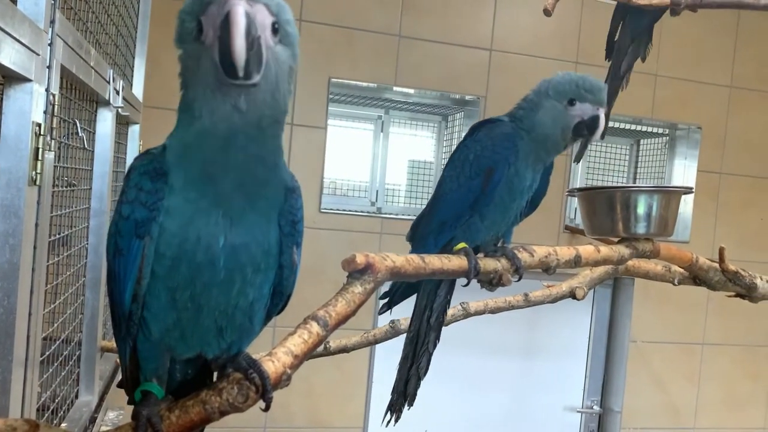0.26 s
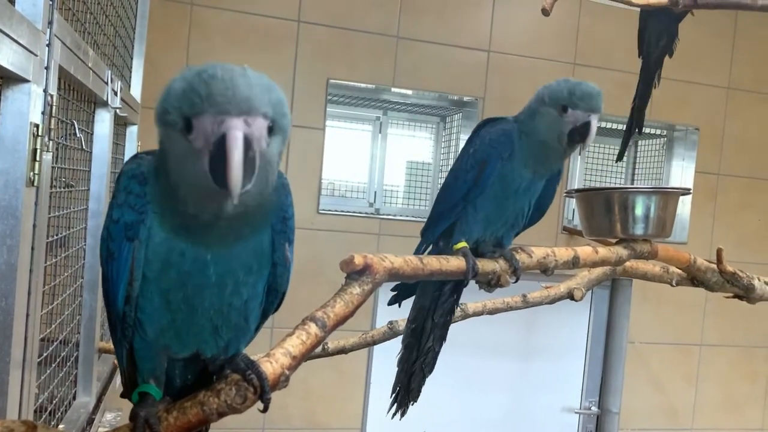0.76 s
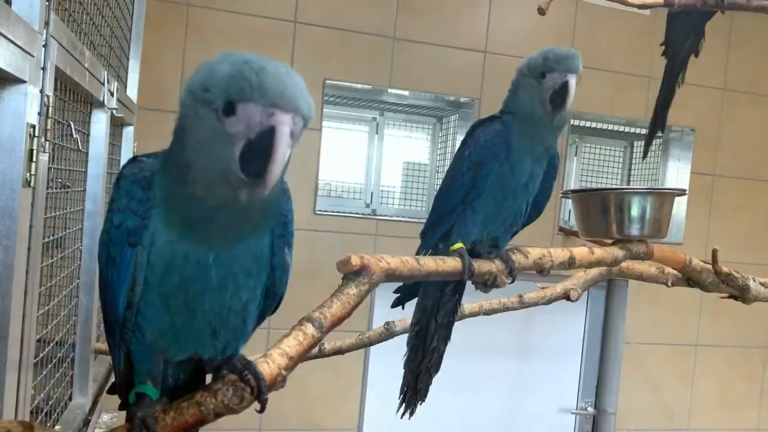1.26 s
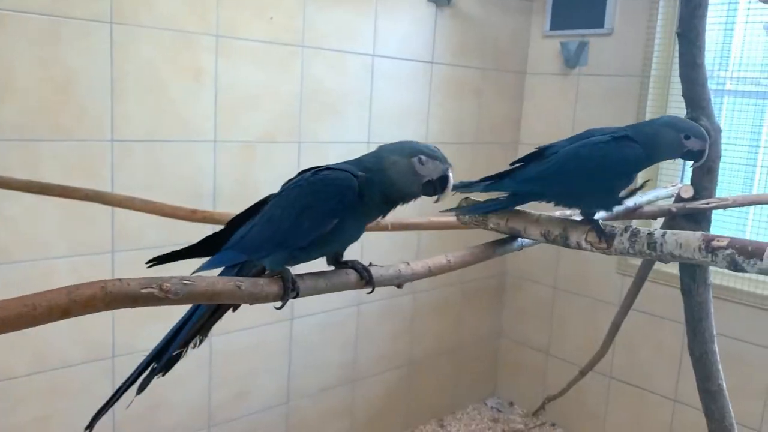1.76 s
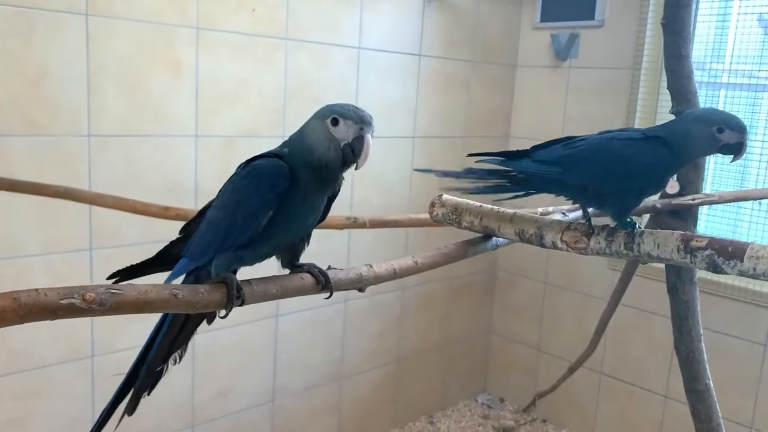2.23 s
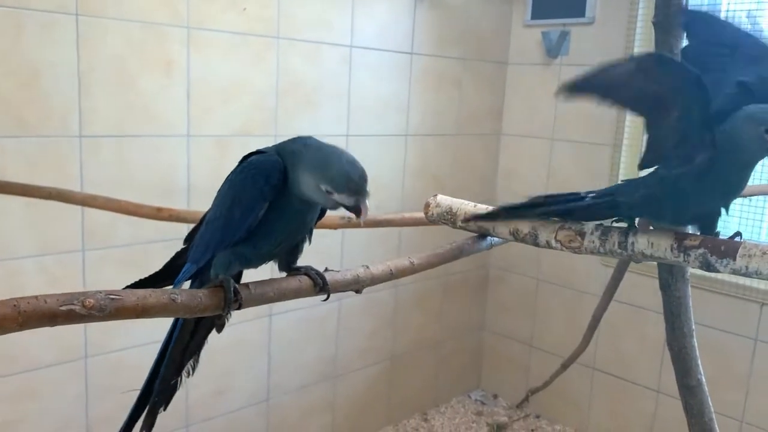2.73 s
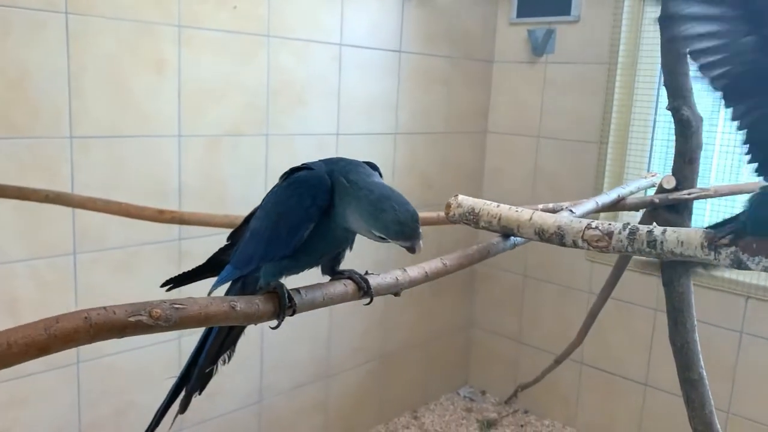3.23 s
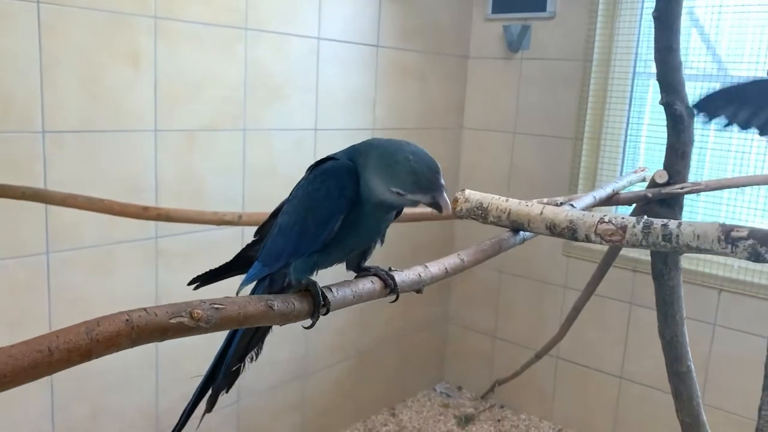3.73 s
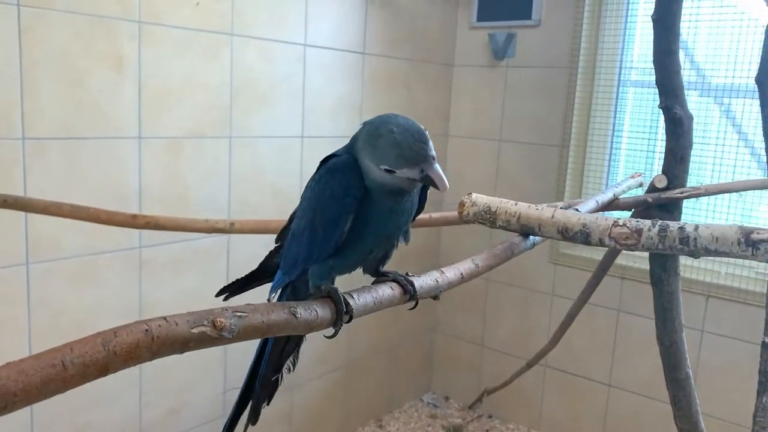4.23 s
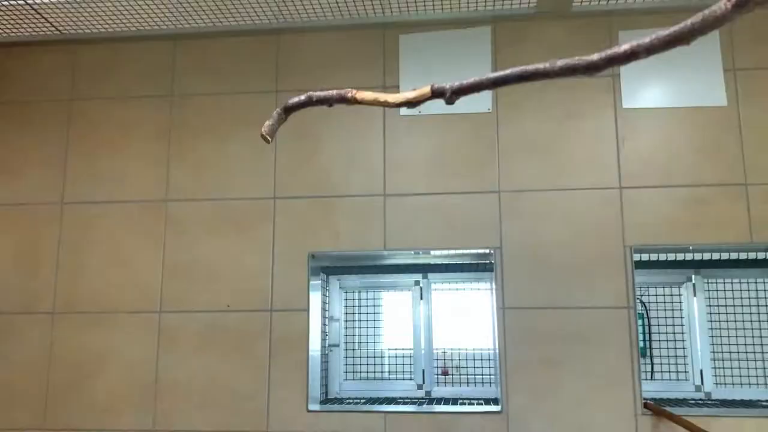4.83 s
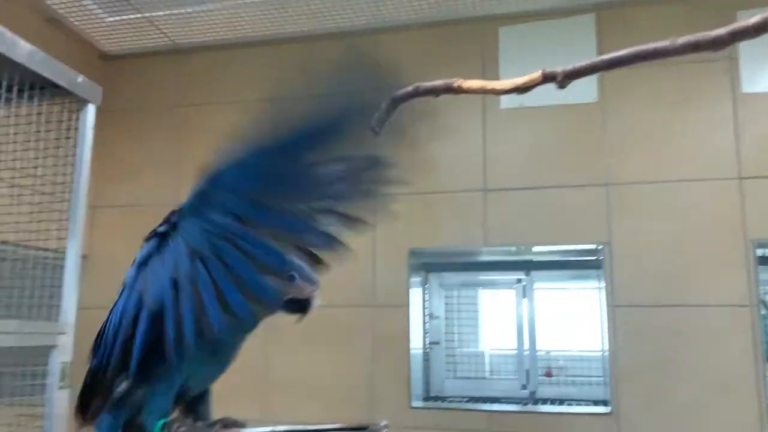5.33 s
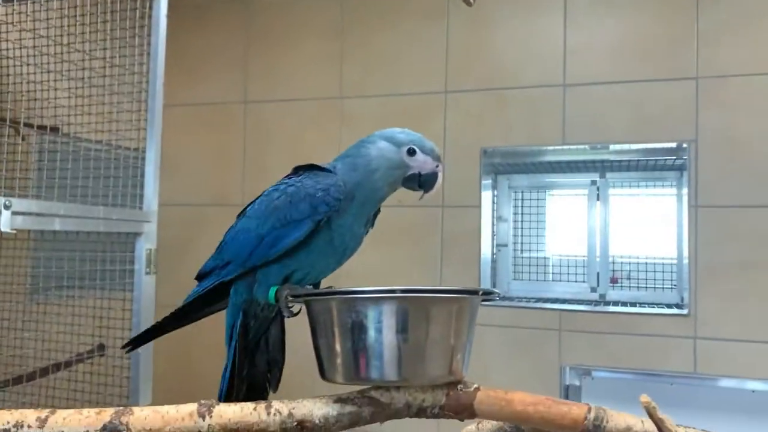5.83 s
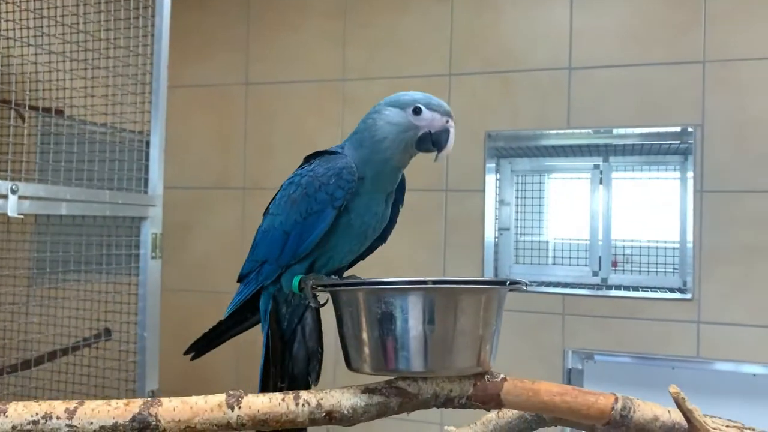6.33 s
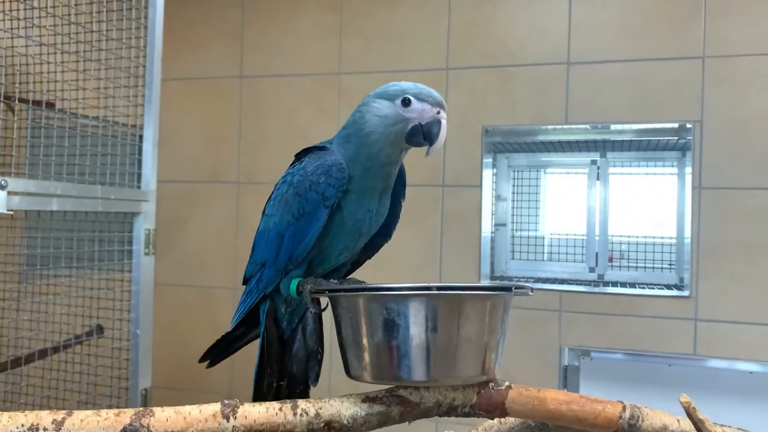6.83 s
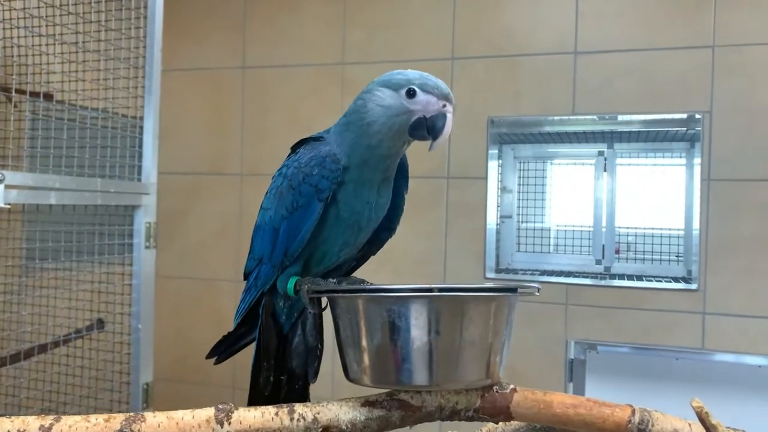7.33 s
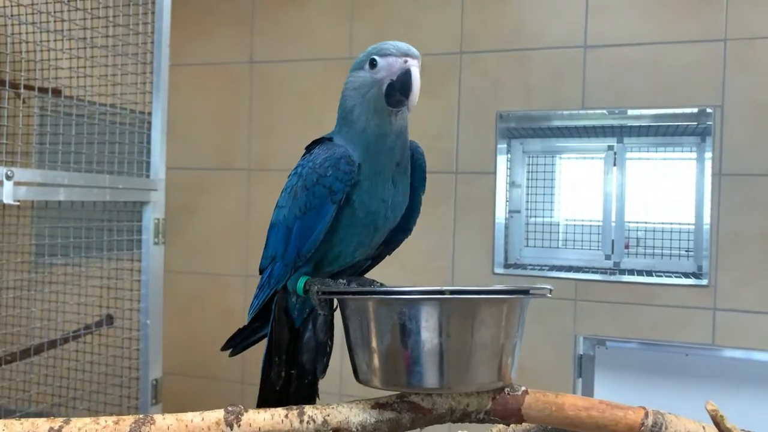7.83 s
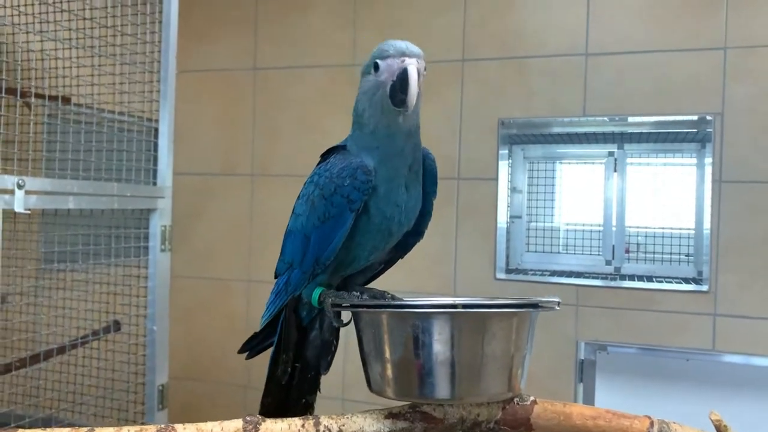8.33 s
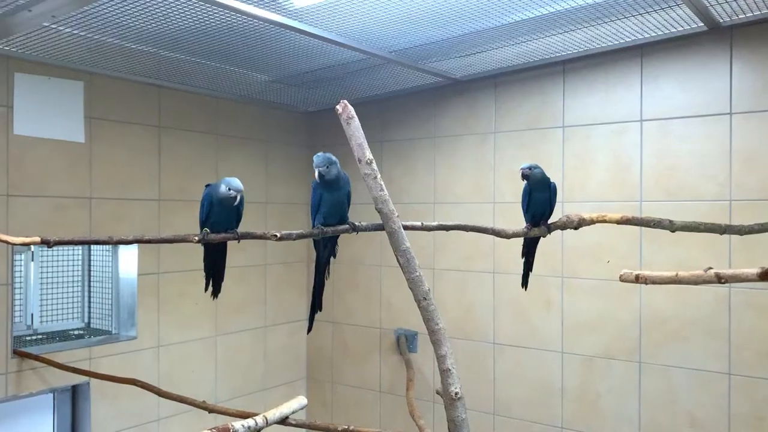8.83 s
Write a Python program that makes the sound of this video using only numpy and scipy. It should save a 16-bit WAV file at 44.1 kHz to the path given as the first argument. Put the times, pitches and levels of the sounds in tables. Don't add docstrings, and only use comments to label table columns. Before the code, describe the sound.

Raspy, shrill macaw calls, some near and some distant, echo brightly around a tiled bird room, with brief pauses between bouts.

```python
import sys
import numpy as np
from scipy import signal
from scipy.fft import rfft, irfft
from scipy.io import wavfile
from scipy.ndimage import uniform_filter1d, minimum_filter1d

SR = 44100
rng = np.random.default_rng(int(sys.argv[2]) if len(sys.argv) > 2 else 0)


def rack_gain(trim_db):
    fader = np.asarray(trim_db, float)
    return 10 ** (fader / 20)


def output_pcm(signal):
    pcm = np.clip(np.atleast_2d(signal).T, -1, 1) * 32767
    wavfile.write(sys.argv[1], SR, np.round(pcm).astype(np.int16))


N = 399546
LEAD = SR // 2

# start_s, level_db
RUMBLE_LEVEL = [(0.0, -69), (0.05, -65), (0.4, -61.5), (0.55, -71), (0.83, -61.5), (1.06, -69.5),
                (3.38, -64.5), (3.56, -52.5), (3.61, -57), (4.87, -74), (4.97, -68.5), (5.65, -81),
                (5.8, -73), (7.74, -88), (8.15, -73.5), (9.06, -68)]
# freq_hz, density_db (per Hz)
RUMBLE_COLOUR = [(22, -30), (36, -14), (47, 0.5), (62, -6.5), (100, -13), (250, -14.5), (500, -17.5),
                 (1200, -48.5)]
# start_s, peak_db
CLAW_TICKS = [
    (0.5502, -61.5),
    (8.12, -47.5),
]
HISS_DB = -104.5

# freq_hz, t60_s
WALL_RING = [(300, 2.58), (800, 1.47), (2100, 1.047), (5500, 0.77), (12000, 0.26)]
ROOM_DB, EARLY_DB = -3.5, -0.5
# start_s, level_db
ROOM_FADE = [
    (4.779, 0),
    (4.999, -8.5),
    (5.012, -32),
]
CUT_S = 5.194

# start_s, length_s, effort_db, pitch_hz, climb_s
SQUAWKS = [(-.3, 0.32, -23, 648.4, 0.023), (0.829, 0.074, -22.5, 617.3, 0.06),
           (0.662, 0.23, -27.5, 597.4, .14), (0.883, 0.089, -15, 646.9, .018),
           (1.075, .19, -20.5, 784.3, .06), (1.41, 0.22, -23, 802, 0.038), (1.641, 0.17, -22.5, 763, 0.02),
           (1.87, 0.36, -23.5, 724.7, .02), (2.259, .34, -23.5, 681, 0.029), (3.286, 0.44, -31.5, 820, 0.1),
           (3.7, 0.32, -18.5, 727.8, .19), (4.031, 0.16, -17.5, 752.8, 0.041),
           (4.435, 0.36, -17.5, 741.6, 0.093), (5, 0.16, -32, 723, 0.076), (5.29, 0.28, -29.5, 847.7, .075),
           (5.619, 0.34, -28, 834.3, 0.2), (5.871, .11, -20.5, 774.8, 0.009),
           (6.242, 0.33, -27.5, 830, 0.077), (6.71, 0.3, -28, 846.7, 0.073), (7.918, 0.71, -59, 846, 0.091),
           (8.524, 0.28, -17.5, 820.5, .07), (8.872, 0.19, -18.5, 780.3, .075)]
# throb_hz, throb_depth (0-1), first_throb_s (after onset), direct_db, shrillness_db (per octave)
THROBS = [(24.4, .3, 0.012, -5, -5), (66.5, 0.63, .004, 11, 0), (47.3, 0.6, 0.01, -2, -1.5),
          (33, 0, 0.023, 5, -0.15), (32.5, 0.7, 0.0099, 1.5, -0.4), (38, 0.4, .01, -1.5, 1),
          (31.3, 0.7, 0.015, -7.5, 0.7), (34.16, 0.92, 0.012, -2.5, -0.4), (34.43, 0, 0.0068, -10, 0.4),
          (34.1, 0.1, 0.012, -6.5, -2.5), (32.4, .85, 0.0011, 2.5, 1.5), (26.94, 0.5, 0.014, 0.4, -0.25),
          (39.94, 0.58, 0.004, -1, 1.8), (44, 0.07, .01, 2, 3), (33.76, 0.85, 0.0089, -15, -.3),
          (29.8, 0.7, 0.0075, 0, 2.4), (71, 0.51, 0.017, 4, 2.5), (35.7, 0.5, 0.0077, -4, 0.67),
          (25, 0.3, .01, -9.5, 1.94), (30, 0, .01, -5, -1), (35, 0.7, 0.012, -15.5, 2),
          (40, .98, .0105, 8, 2.5)]
HOARSENESS = [.6, .2, .85, .26, .5, .62, .52, .42, .58, .8, .42, .4, .55, .75, .75, .8, .3, .75, .65, .85,
              .8, .2]
PERCH_DELAYS = [3, 10, 8, 8, -11, -11, 1, 12, 12, -14, 10, 3, 11, 1, -14, -14, -2, -13, -14, -13, -14, 7]
BEAK_OPENINGS = [0.94, .59, 0.94, .88, .97, 0.94, .9, 0.93, 0.94, .97, 0.92, 1.02, 0.99, 0.97, 1.034, 0.9,
                 .98, 0.98, 0.93, 0.99, .97, 1.02]
MANNERS = "yelp croak wind yelp cry cry cry cry cry cry wind yelp snap surge cry surge yelp cry cry cry cry trill".split()
WAYS_OF_CALLING = {"wind": (2250.5, -23.5, 1.1, -3.5, 22, 0.95),
                   "surge": (2401.5, -19, 0.4, -1, 22.5, 0.93), "snap": (1999.5, 1, 0.35, -10, 59, 0.96),
                   "cry": (1700, -10, 0.8, -3, 150, 1.04), "trill": (2703.5, 1.2, .4, -8, 200, 0.9),
                   "croak": (998.5, -7, 2.1, -0.5, 5, 0.96), "yelp": (1497, -5, 2.9, -12, 121, 1.12)}
THROB_SLOWING = {"trill": 55}
# freq_hz, level_db
THROAT = [(250, 1.5), (700, -12.5), (1050, -7.5), (1500, -10), (2100, 3.5), (2550, 0.5), (3250, -15.5),
          (4400, -8), (5200, -16), (6100, -19.5), (7300, -32.5), (8900, -27.5), (11000, -36), (15500, -50)]
# freq_hz, level_db
BEAK_BEAM = [(1500, -1.47), (3300, -6.5), (4300, 1), (6200, 0.5), (9000, -2.5), (15000, 5.5)]
SLACK_HZ = 295
BREATH = .42
DULLING = 0.12
RIPPLE_DB = 3.5

# freq_hz, likeness (-1 to 1)
PORT_LIKENESS = [(40, 0.92), (90, .85), (300, 0.86), (640, 0.25), (1400, -0.29), (3100, 0.17),
                 (7000, 0.062), (11000, -0.11)]
# freq_hz, left_minus_right_db
PORT_LEAN = [(200, 0), (700, 1), (1300, -2), (2400, -3.5), (4400, 4), (8100, 0.7), (12000, 4.5)]
# freq_hz, level_db
MIC_HOUSING = [(2750, 0.58), (3250, -1.5), (3750, -4), (6600, -1.55), (7300, -1.5), (8000, 0.4)]
MONO_HZ = 9500
CEILING = .93


def evened(x):
    return x / np.sqrt(np.mean(abs(x) ** 2) + 1e-20)


def read(points, hz):
    f, value = np.transpose(points)
    return np.interp(np.log(hz + 1), np.log(f + 1), value)


def add(mix, at, sound):
    part = mix[at:][:len(sound)]
    part += sound[:len(part)]


def wander(count, hz):
    r = np.exp(-2 * np.pi * hz / SR)
    noise = rng.standard_normal((count, 2)) @ [1, 1j]
    return evened(signal.lfilter([1], [1, -2 * r, r * r], noise))


def paired(z, hz):
    alike = np.clip(read(PORT_LIKENESS, hz), -1, 1)[:, None]
    return np.array([z[0], alike * z[0] + np.sqrt(1 - alike ** 2) * z[1]])


def hiss():
    return rack_gain(HISS_DB) * rng.standard_normal((2, N))


def rumble():
    frames, hz = N // 1024 + 6, np.fft.rfftfreq(4096, 1 / SR)
    z = (rng.standard_normal((frames, 2049, 2, 2)) @ [1, 1j]).T
    z = paired(z, hz) * rack_gain(read(RUMBLE_COLOUR, hz))[:, None]
    air = signal.istft(z, nperseg=4096, noverlap=3072)[1][:, :N]
    s, db = np.transpose(RUMBLE_LEVEL)
    return evened(air) * rack_gain(np.interp(np.arange(N) / SR, s, db))


def ticks():
    out, t = np.zeros(N), np.arange(3000) / SR
    for start_s, peak_db in CLAW_TICKS:
        scratch = np.diff(rng.standard_normal(len(t) + 1))
        add(out, round(start_s * SR), rack_gain(peak_db - 10.5 - 60 * t / .05) * scratch)
    return out


def aviary():
    taps = rng.choice([-1., 1.], (2, 2 * SR)) * (rng.random((2, 2 * SR)) < .08)
    taps *= np.clip(np.arange(2 * SR) / (0.029 * SR) - .2, 0, 1)
    hz, t, z = signal.stft(taps, SR, nperseg=256)
    decay = rack_gain(-60 * t / read(WALL_RING, hz)[:, None])
    tail = signal.istft(paired(z, hz) * decay, SR, nperseg=256)[1]
    tail *= rack_gain(ROOM_DB) / np.linalg.norm(tail[0])
    early = rng.integers(130, 1300, (2, 8))
    for side in range(2):
        tail[side, early[side]] += rack_gain(EARLY_DB) * rng.choice([-1, 1], 8) / np.sqrt(8)
    return tail


def outline(way, beak, start, length, effort_db, hz, climb_s):
    climb_hz, swell_db, share, fade_db, sag_hz, shut = WAYS_OF_CALLING[way]
    climb_s, share = np.clip(climb_s, .004, .95 * length), np.clip(share, .05, .99)
    low_hz = max(hz - climb_hz * climb_s, SLACK_HZ)
    full_hz = low_hz + share * (hz - low_hz)
    full_beak = (shut + share * (1 - shut)) * beak
    top_db = effort_db + fade_db * climb_s * (1 - share) / length
    return [(start, effort_db + swell_db, low_hz, shut * beak),
            (start + share * climb_s, effort_db, full_hz, full_beak),
            (start + climb_s, top_db, hz, beak),
            (start + length, effort_db + fade_db, hz - sag_hz * (length - climb_s), beak)]


def membranes(hz, throb, swing, hoarse):
    count = hz.size
    blur_hz = 90 + 330 * hoarse[0] ** 2
    hoarse = hoarse[1]
    shake = 0.019 * throb * swing + 0.019 * hoarse * wander(count, 60).real
    turns = np.cumsum(hz * (1 + shake)) / SR
    sound = np.zeros(count)
    for k in range(1, int(15500 / hz.min())):
        smear = 1 - hoarse + hoarse * wander(count, min(55 * k, blur_hz))
        sound += (k * hz < 16000) * (smear * np.exp(2j * np.pi * k * turns)).real
    puffs = (1 + 1.1 * np.cos(2 * np.pi * turns)) * rng.standard_normal(count)
    puffs = signal.sosfilt(signal.butter(2, 620, "high", fs=SR, output="sos"), puffs)
    sound += BREATH * hoarse * np.sqrt(SR / 4 / hz) * puffs
    return sound * (1 + .5 * hoarse * wander(count, 140).real)


def through_throat(sound, t, effort_db, hz, beak, shrill_db):
    f, when, z = signal.stft(sound, SR, nperseg=512, noverlap=384)
    f, when = f[:, None], when + t[0]
    opening = np.interp(when, t, np.clip(beak, .5, 1.25))
    low = np.interp(when, t, hz)
    weakness_db = np.interp(when, t, effort_db.max() - effort_db)
    tilt_db = shrill_db - DULLING * weakness_db * (f > 2000)
    colour_db = read(THROAT, f / opening) + tilt_db * np.log2(f / 2000 + .01)
    pockets = sum(np.sin(2 * np.pi * (f / opening / spacing + rng.random()))
                  for spacing in (1300, 2100, 3700))
    colour_db += RIPPLE_DB * np.clip(f / 4000 - 1, 0, 1) * pockets
    colour_db -= np.clip(75 * (.8 - f / low), 0, 70)
    voice = signal.istft(z * rack_gain(colour_db), SR, nperseg=512, noverlap=384)[1][:len(t)]
    return voice / np.sqrt(uniform_filter1d(voice ** 2, size=1800) + 1e-12)


def squawk(rows, hoarse, throb_hz, throb, first_s, shrill_db, slowing):
    s, *columns = np.transpose(rows)
    t = np.arange(s[0], s[-1], 1 / SR)
    effort_db, hz, beak = (np.interp(t, s, c) for c in columns)
    effort_db = uniform_filter1d(effort_db, size=900, mode="nearest")
    since = t - s[0] - first_s
    beats = since * (throb_hz - slowing * since)
    held = np.interp(np.round(beats), beats, t)
    depth = np.clip(throb, 0, 1)
    hz = hz + depth ** 2 * (np.interp(held, s, columns[1]) - hz)
    swing = np.cos(2 * np.pi * beats)
    tiring = ((t - s[0]) / (s[-1] - s[0])) ** 3
    slack = np.maximum(.9 - hz / hz.max(), 0)
    rattle = np.clip(hoarse + 2.2 * slack + .3 * tiring, 0, .97)
    sound = membranes(hz, throb, swing, (hoarse, rattle))
    voice = through_throat(sound, t, effort_db, hz, beak, shrill_db)
    pulse = evened(1 - depth * np.clip(.5 - 1.1 * swing, 0, 1))
    ramp = np.minimum((t - s[0]) / 0.0091, (s[-1] - t) / 0.03)
    fade = np.sin(np.pi / 2 * np.clip(ramp, 0, 1)) ** 2
    low_cut = signal.butter(4, 230, "high", fs=SR, output="sos")
    return signal.sosfilt(low_cut, rack_gain(effort_db) * voice * pulse * fade)


def birds():
    total = N + LEAD
    direct, sent = np.zeros((2, total)), np.zeros((3, total))
    calls = zip(MANNERS, BEAK_OPENINGS, SQUAWKS, HOARSENESS, PERCH_DELAYS, THROBS)
    for way, beak, row, hoarse, lag, (*throbbing, direct_db, shrill_db) in calls:
        start = row[0]
        rows = outline(way, beak, *row)
        voice = squawk(rows, hoarse, *throbbing, shrill_db, THROB_SLOWING.get(way, 0))
        at = LEAD + round(start * SR)
        stretch = int(start > ROOM_FADE[1][0]) + int(start > CUT_S)
        add(sent[stretch], at, voice)
        add(direct[0], at + lag, rack_gain(direct_db) * voice)
        add(direct[1], at, rack_gain(direct_db) * voice)
    beam = rack_gain(read(BEAK_BEAM, np.fft.rfftfreq(total, 1 / SR)))
    direct = irfft(rfft(direct, axis=1) * beam, total, axis=1)
    room = aviary()
    first, before, after = (signal.oaconvolve(x[None], room, axes=1)[:, :total] for x in sent)
    t = (np.arange(total) - LEAD) / SR
    first = first * rack_gain(np.interp(t, *np.transpose(ROOM_FADE)))
    passing = np.clip((CUT_S - t) / 0.0075 + 1, rack_gain(-34.0), 1)
    return (direct + first + before * passing + after)[:, LEAD:]


def scene():
    return hiss() + rumble() + ticks() + birds()


def low_pass(x):
    return signal.sosfilt(signal.butter(12, 15730, fs=SR, output="sos"), x)


def record(dry):
    hz = np.fft.rfftfreq(N, 1 / SR)
    port_db = np.outer([.5, -.5], read(PORT_LEAN, hz)) + read(MIC_HOUSING, hz)
    left, right = rfft(dry, axis=1) * rack_gain(port_db)
    mid = (left + right) / 2
    side = (left - right) / 2 / (1 + (hz / MONO_HZ) ** 6)
    ported = irfft(np.array([mid + side, mid - side]), N, axis=1)
    headroom = np.minimum(CEILING / (abs(ported).max(0) + 1e-9), 1)
    headroom = minimum_filter1d(headroom, size=441)
    return low_pass(ported * uniform_filter1d(headroom, size=441))


dry = scene()
out = record(dry)
output_pcm(out)
```